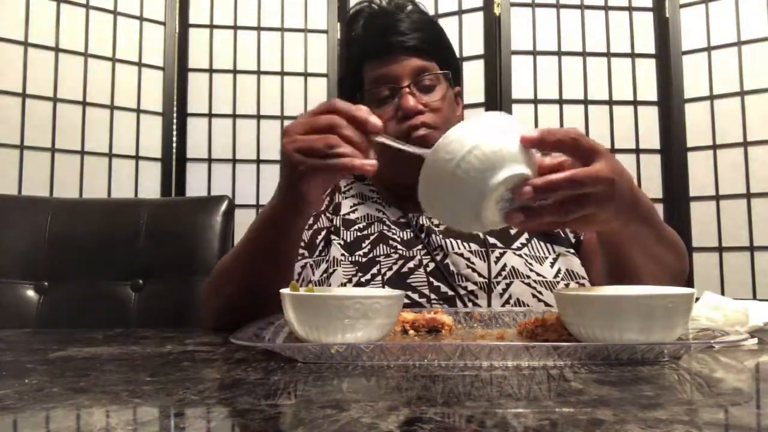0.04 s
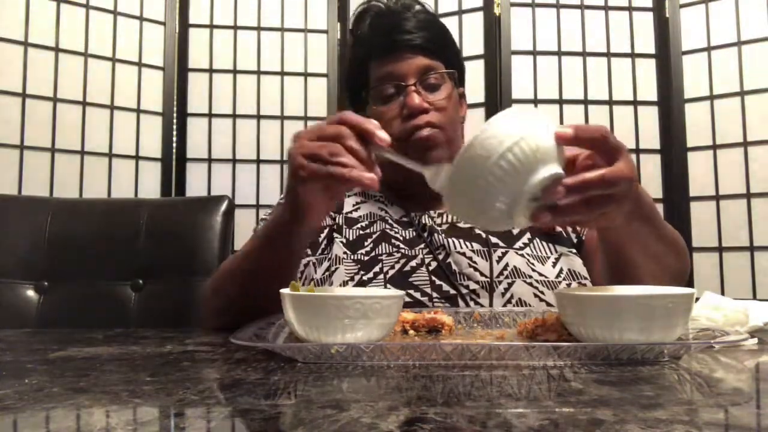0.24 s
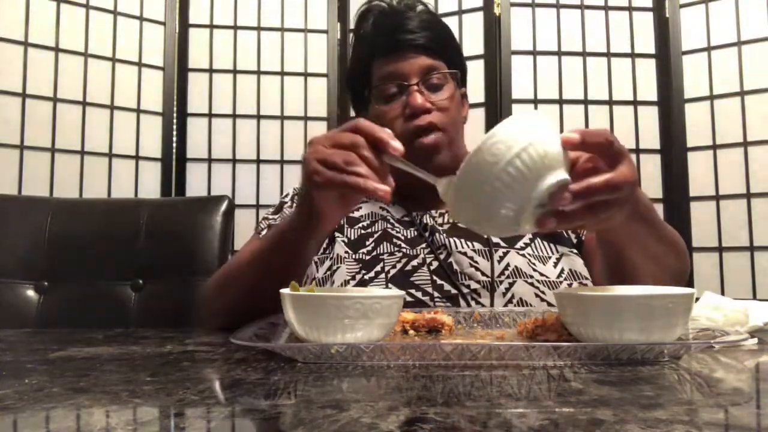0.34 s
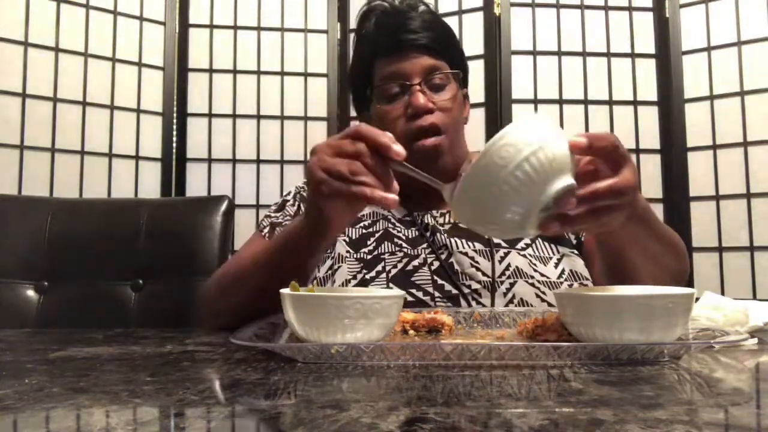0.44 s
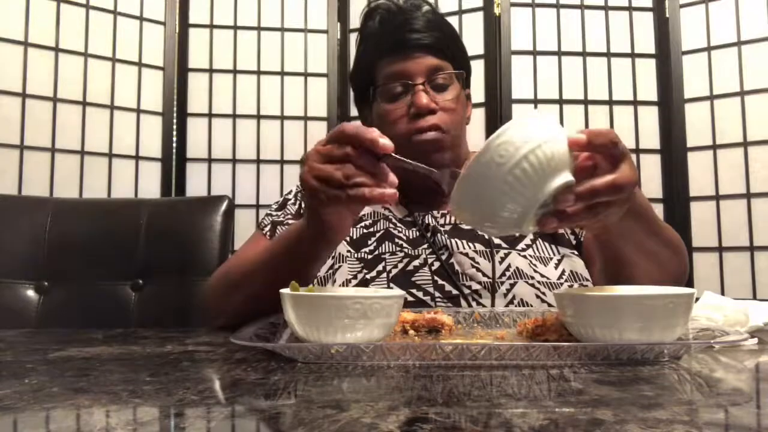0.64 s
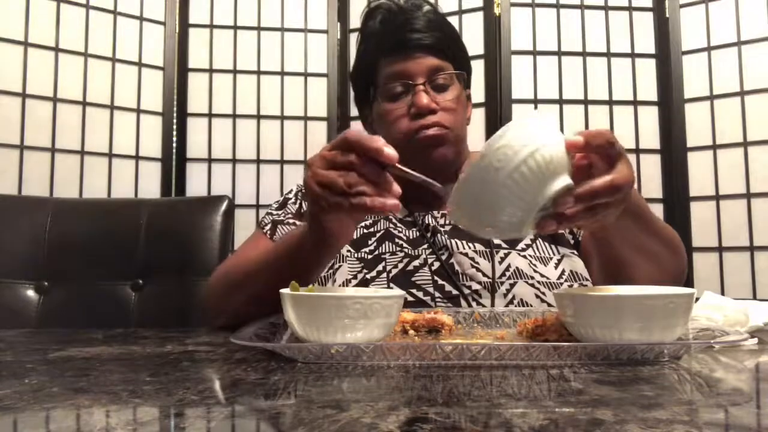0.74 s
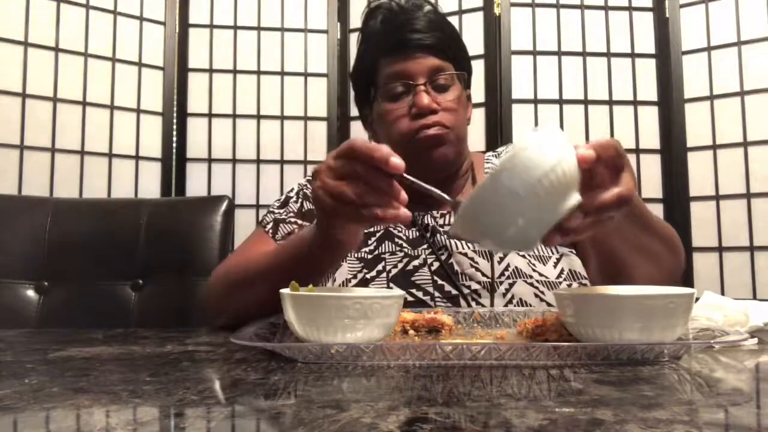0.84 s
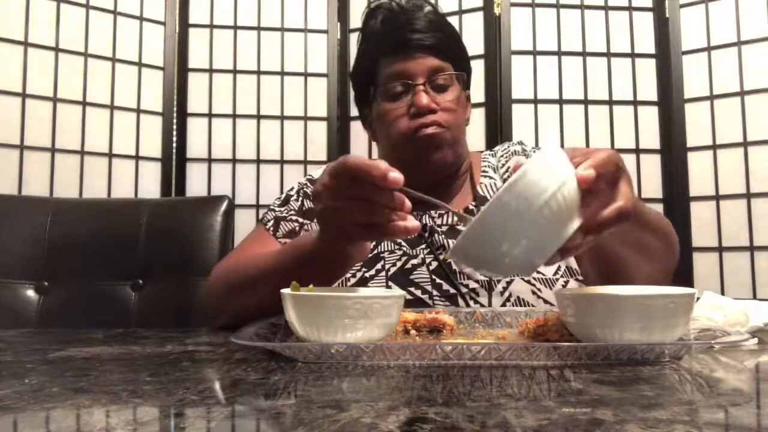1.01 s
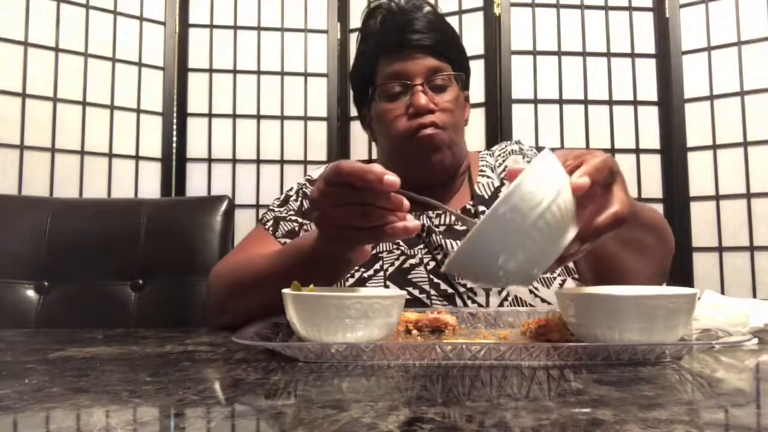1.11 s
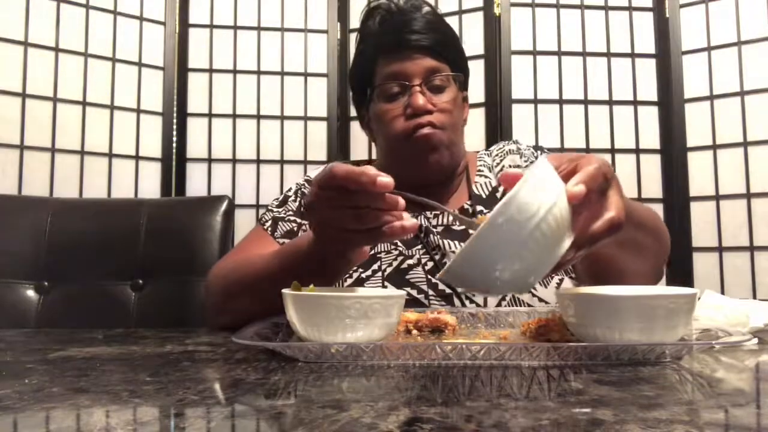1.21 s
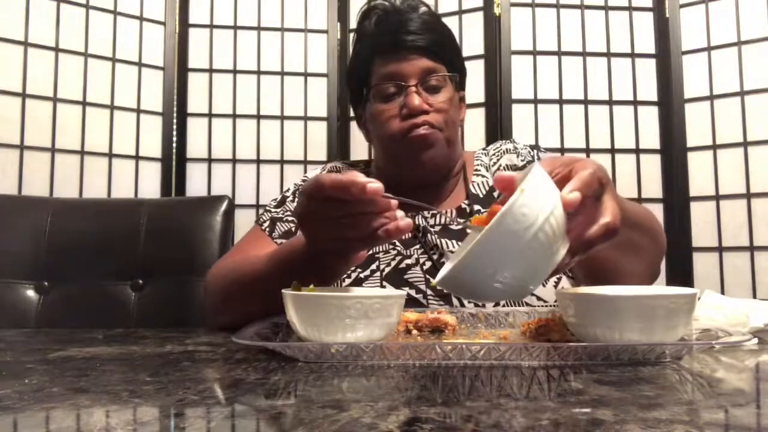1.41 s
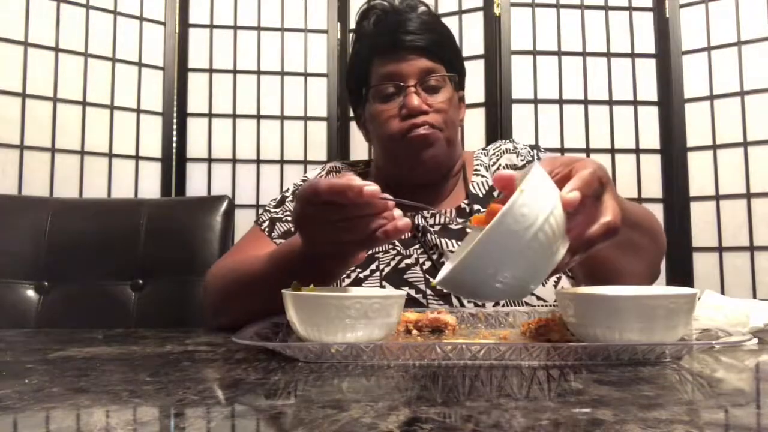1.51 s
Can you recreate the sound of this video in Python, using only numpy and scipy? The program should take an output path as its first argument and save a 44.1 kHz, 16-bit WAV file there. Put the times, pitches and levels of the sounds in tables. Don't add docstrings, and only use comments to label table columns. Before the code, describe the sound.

A fork scoops soft food from a hand-held ceramic bowl. Faint sliding starts it; at 0.22 s a hard, bright double clink rings briefly, damped by the hand. Ticks and a soft pop cluster at 0.44 s, a dull rub at 0.56 s, lighter clinks at 0.61, 0.78 and 0.95 s, then faint scraping and tiny taps until about 1.35 s. Small room, short echo, low hum, phone a metre away.

```python
import sys
import numpy as np
from scipy import signal
from scipy.fft import rfft, irfft
from scipy.io import wavfile

SR = 44100
rng = np.random.default_rng(int(sys.argv[2]) if len(sys.argv) > 2 else 0)


def nominal_scale(level):
    x = np.asarray(level, float) / 20
    return 10 ** x


def dump(signal):
    limited = np.clip(np.atleast_2d(signal).T, -1, 1)
    pcm = np.round(limited * 32767).astype(np.int16)
    wavfile.write(sys.argv[1], SR, pcm)


N = 68355
ONSET_S = 0.00051


def level(x, db):
    return x * nominal_scale(db) / np.sqrt(np.mean(x ** 2))


def band(x, hz, width_hz):
    return signal.lfilter(*signal.iirpeak(min(hz, .45 * SR), hz / width_hz, fs=SR), x)


def steep_band(x, hz, width_hz):
    return band(band(x, hz, width_hz), hz, width_hz)


def add(out, start_s, x):
    i = int(start_s * SR)
    out[i:i + len(x)] += x[:N - i]


def fade(t60_s, size=8000):
    t = np.arange(size) / SR
    return t, np.exp(-np.log(1000) * t / np.reshape(t60_s, (-1, 1)))


def onset(t, rise_s=ONSET_S):
    return np.minimum(t / rise_s, 1)


BOWL_HZ = (1560, 1690, 2520, 3010, 3765, 3830, 4240, 5314, 6500, 6670, 6800, 7550, 10090, 14200)
BOWL_DB = (-10.5, -0.5, -4.5, -6.5, -7, 0, -5.5, -6, -4.5, -2.5, -2, -11.5, -3, -5)
BOWL_T60_S = (.035, .025, .025, .02, .09, .06, .03, .03, .045, .05, .08, .025, .045, .05)
FORK_HZ = (8750, 10450, 11420, 12600, 13540, 14790, 15240, 15560)
FORK_DB = (-8.5, -7, -9, -9.5, -1, -6.5, -8.5, -13)
FORK_T60_S = (.025, .025, .035, .015, .02, .045, .025, .025)
STRIKE_HZ = (1700, 3800, 6700, 12000)
CRACK_DB = (-9, 0, 1, 1)
# t/s, level/dB in each of the four strike bands
CLINKS = [(.2160, -18, -21, -19, -18), (.2187, -30, -25, -20.5, -21), (0.3139, -46, -49, -35, -64),
          (0.3379, -50, -44, -35, -45), (0.6119, -26.5, -30.5, -36.5, -41.5),
          (.7820, -31.5, -55, -36.5, -68), (.2222, -40, -30, -26, -30), (0.9529, -30, -32, -33, -46),
          (1.2330, -42.5, -51, -61, -69), (1.285, -50, -48, -48, -42), (1.328, -63, -45, -53, -50)]
CRACK_T60_S, PLACE_SD_DB, DETUNE_SD = 0.047, 1.25, 0.0015
HARD_DB, RING_GROWTH, FORK_GROWTH = -17, 0.54, 0.94


def clinks():
    out = np.zeros(N)
    hz = np.array(BOWL_HZ + FORK_HZ)
    mode_db = np.array(BOWL_DB + FORK_DB)
    t60_s = np.array(BOWL_T60_S + FORK_T60_S)
    fork = slice(len(BOWL_HZ), None)
    for start_s, *strike_db in CLINKS:
        place, sign, detune = rng.standard_normal((3, len(hz)))
        hardness_db = max(strike_db) - HARD_DB
        soft_db = FORK_GROWTH * min(hardness_db, 0)
        force_db = np.interp(np.log(hz), np.log(STRIKE_HZ), strike_db)
        gain = nominal_scale(mode_db + force_db + PLACE_SD_DB * place)
        gain[fork] *= nominal_scale(soft_db) * np.sign(sign[fork])
        t, decay = fade(t60_s * nominal_scale(RING_GROWTH * hardness_db))
        struck_hz = hz * (1 + DETUNE_SD * detune)
        modes = decay * np.sin(2 * np.pi * struck_hz[:, None] * t)
        add(out, start_s, gain @ modes * onset(t))

        burst = rng.standard_normal(2000) * fade(CRACK_T60_S, size=2000)[1][0]
        for f, force, crack in zip(STRIKE_HZ, strike_db, CRACK_DB):
            noise = band(band(burst, f, 0.72 * f), f, f)
            add(out, start_s, nominal_scale(force + crack + soft_db / 2) * noise)
    return out


# t/s, level/dB, f/Hz, t60/s
RINGS = [(.2163, -16.5, 3802, .07), (0.2185, -40, 3772, 0.37), (.2167, -50, 14210, 0.18),
         (.2190, -15, 6500, 0.056), (0.4408, -50, 2500, .3), (.5850, -58, 3360, .15),
         (0.6125, -31, 6680, 0.03), (0.6124, -32, 1660, .02), (.6126, -52.5, 8730, 0.046),
         (.7824, -46, 3758, 0.15), (.7825, -53.5, 1561, 0.16), (0.782, -49, 6826, 0.088),
         (0.784, -51, 2950, 0.072), (0.953, -33, 7700, 0.0074), (0.9531, -30, 4010, 0.026),
         (0.9534, -45, 1750, 0.02), (.9530, -41, 10260, 0.025), (.9531, -34.5, 2350, 0.025),
         (0.9527, -41, 6794, 0.3), (.9530, -42, 6960, .2), (0.954, -53.5, 4220, 0.19),
         (1.1450, -61, 7270, 0.19), (.8530, -53, 1561, .09), (1.2850, -46, 1292, .08),
         (1.2850, -50, 3700, .07), (1.2850, -54, 5502, .08), (1.2850, -52, 6848, .08),
         (1.2860, -50, 6600, .05), (.2650, -38, 3810, .2), (.2480, -38, 6700, .12)]
FLUTTER_HZ, FLUTTER_DB = 79, 5


def rings():
    out = np.zeros(N)
    lowpass = signal.butter(2, FLUTTER_HZ, fs=SR)
    for start_s, db, hz, t60_s in RINGS:
        t, decay = fade(t60_s, size=16000)
        flutter = level(signal.lfilter(*lowpass, rng.standard_normal(len(t))), 0)
        tone = decay[0] * np.sin(2 * np.pi * hz * t) * onset(t)
        add(out, start_s, nominal_scale(db + FLUTTER_DB * flutter) * tone)
    return out


# t/s, level/dB, f/Hz, t60/s
DRY_RINGS = [(.6122, -22, 6690, .035), (.9527, -28, 6850, .014), (.9527, -42, 14200, .03),
             (.9527, -36, 5300, .012), (.7822, -36, 15100, .015), (1.2848, -44, 3600, .02),
             (.2163, -26, 2250, .02), (.2320, -36, 14200, .1), (.2180, -34, 10090, .15),
             (.4410, -38, 1600, .04), (1.0380, -52, 2400, .03)]


def dry_rings():
    out = np.zeros(N)
    for start_s, db, hz, t60_s in DRY_RINGS:
        t, decay = fade(t60_s)
        add(out, start_s, nominal_scale(db) * decay[0] * np.sin(2 * np.pi * hz * t) * onset(t))
    return out


# t/s, level/dB, f/Hz, t60/s
TICKS = [(.0160, -40, 894, 0.023), (0.3382, -44, 15000, .006), (.3880, -56, 14100, 0.0053),
         (.4350, -35, 8530, 0.0089), (0.435, -30, 15500, 0.0065), (0.4356, -38, 2960, 0.011),
         (0.439, -34, 2600, 0.023), (.4400, -25, 3410, 0.0095), (0.4414, -38, 12900, .01),
         (0.4385, -33.5, 7580, 0.012), (0.4422, -30, 1710, 0.017), (.4420, -28.5, 520, 0.013),
         (.4490, -37, 9800, 0.0063), (.4645, -38, 12200, 0.011), (.4648, -42, 15200, 0.0066),
         (.5560, -39, 790, .022), (.5850, -61, 8400, 0.027), (.6710, -51, 14400, 0.0087),
         (.6860, -58, 13100, .008), (.7820, -34, 15500, .012), (.7822, -26.5, 8530, 0.01),
         (.7835, -40, 8340, 0.019), (1.0640, -41.5, 820, 0.021), (1.2852, -52, 2250, 0.035),
         (.5550, -52, 5100, .012), (.9530, -33, 6900, .012), (1.2330, -55, 2450, .025),
         (.2240, -33, 14800, .02), (1.466, -56, 3100, 0.037)]
TICK_RISE_S, TICK_NOISE = 0.00043, 0.61


def ticks():
    out = np.zeros(N)
    for start_s, db, hz, t60_s in TICKS:
        t, decay = fade(t60_s, size=2000)
        noise = level(steep_band(rng.standard_normal(len(t)), hz, hz / 3), 0)
        knock = np.sin(2 * np.pi * hz * t) + TICK_NOISE * noise
        add(out, start_s, nominal_scale(db) * decay[0] * onset(t, TICK_RISE_S) * knock)
    return out


def grit(per_s, spread_db):
    hit, sign, size = rng.random((3, N))
    size_db = -spread_db * np.log(1 - size)
    return level((hit < per_s / SR) * np.sign(sign - .5) * nominal_scale(size_db), 0)


def gate(start_s, length_s, edge_s=0.016):
    t = np.arange(N) / SR - start_s
    return np.clip(np.minimum(t * 4, length_s + edge_s - t) / edge_s, 0, 1)


# t/s, length/s, level/dB, f/Hz, width/Hz
RUBS = [(0.014, 0.061, -57.5, 680, 900), (.217, 0.016, -32.5, 4700, 4000), (.218, .03, -43, 12500, 6000),
        (0.434, .005, -44.5, 12000, 8000), (0.439, 0.0027, -37.5, 805, 910), (.498, .03, -66, 2550, 200),
        (.556, .12, -52.5, 695, 200), (.557, 0.096, -56, 906, 231.5), (0.655, 0.01, -66, 7600, 800),
        (.783, .015, -55, 14100, 2500), (1.32, 0.025, -60, 3650, 250), (1.255, 0.012, -64, 6850, 200),
        (0.996, 0.094, -53.5, 247, 120), (1.016, 0.18, -66, 2940, 3000), (1.224, 0.1, -57, 1300, 90),
        (1.231, 0.11, -66, 4250, 300)]
RUB_PER_S, RUB_SPREAD_DB = 3700, 1.9


def rubs():
    out = np.zeros(N)
    for start_s, length_s, db, hz, width_hz in RUBS:
        rub = steep_band(grit(RUB_PER_S, RUB_SPREAD_DB), hz, width_hz)
        out += gate(start_s, length_s) * level(rub, db)
    return out


# t/s, length/s, level/dB
DRAGS = [
    (0.242, 0.12, -55),
    (.96, 0.32, -67.5),
    (1.226, 0.121, -65.5),
    (1.28, 0.0053, -52),
]
DRAG_PER_S, DRAG_SPREAD_DB, DRAG_TILT_DB_PER_OCT = 990, 2.94, -1.5


def drags():
    slips = grit(DRAG_PER_S, DRAG_SPREAD_DB)
    ring = np.zeros(N)
    for hz, db, t60_s in zip(BOWL_HZ, BOWL_DB, BOWL_T60_S):
        tilt_db = DRAG_TILT_DB_PER_OCT * np.log2(hz / 4000)
        ring += level(band(slips, hz, 6 / t60_s), db + tilt_db)
    pressure = sum(nominal_scale(db) * gate(start_s, length_s) for start_s, length_s, db in DRAGS)
    return level(ring, 0) * pressure


# t/s, level/dB, f/Hz, width/Hz, t60/s
WASHES = [(.2170, -47, 5000, 5000, .12), (.4440, -46, 3700, 1400, .25), (.4420, -54, 1400, 900, .1),
          (.6125, -42, 2700, 1200, .1), (.7850, -56, 8800, 1500, .2), (.7850, -58, 14600, 2000, .15),
          (.9535, -47, 3900, 900, .25), (.9535, -46, 2600, 1200, .15), (.9535, -48, 5700, 1200, .2),
          (.2165, -36, 720, 250, .03), (.2165, -38, 980, 200, .03), (.6122, -34, 6700, 300, .12),
          (.9528, -36, 6200, 1800, .012), (.9530, -57, 14100, 500, .2), (.7822, -38, 15200, 1200, .02),
          (.6125, -50, 14100, 500, .05), (.9535, -45, 6950, 400, .3)]


def washes():
    out = np.zeros(N)
    for start_s, db, hz, width_hz, t60_s in WASHES:
        t, decay = fade(t60_s)
        noise = level(steep_band(rng.standard_normal(len(t)), hz, width_hz), db)
        add(out, start_s, decay[0] * onset(t) * noise)
    return out


# f/Hz, t60/s
ROOM_T60 = [(500, 0.36), (2000, 0.33), (5000, 0.35), (7000, .3), (10000, 0.17), (15000, 0.34)]
ROOM_DB, ROOM_GAP_S = -12.5, 0.0026


def room(x):
    hz, t60_s = np.array(ROOM_T60).T
    bands_hz = 300 * 2 ** np.arange(0, 5.8, .5)
    t, decays = fade(np.interp(np.log(bands_hz), np.log(hz), t60_s), size=22050)
    echo = np.zeros(len(t))
    for f, decay in zip(bands_hz, decays):
        echo += decay * band(rng.standard_normal(len(t)), f, f / 3)
    echo *= t > ROOM_GAP_S
    echo *= nominal_scale(ROOM_DB) / np.sqrt(np.sum(echo ** 2))
    return signal.fftconvolve(x, echo)[:N]


# f/Hz, level/dB per Hz
HUSH = [(41, -57), (70, -13), (194, -7), (232, -1.5), (334, -10.5), (429, -7.5), (1160, -23), (7270, -41),
        (15700, -59)]
# f/Hz, width/Hz, level/dB
DRONES = [(169.3, 11, -54), (220, 5.9, -53.5), (243.3, 18, -56.5), (339.4, 17, -60.5), (385.5, 17, -63),
          (6900, 300, -76.5), (13800, 4000, -80.5)]
HUSH_DB, HUM_HZ, HUM_DB = -50, 54.3, -64.5


def hush():
    f = np.arange(1, N // 2 + 2) * SR / N
    hz, db = np.array(HUSH).T
    shape = nominal_scale(np.interp(np.log(f), np.log(hz), db, left=-60))
    air = level(irfft(rfft(rng.standard_normal(N)) * shape, N), HUSH_DB)
    drone = sum(level(band(rng.standard_normal(N), f0, width), d) for f0, width, d in DRONES)
    hum = nominal_scale(HUM_DB) * np.sqrt(2) * np.sin(2 * np.pi * HUM_HZ * np.arange(N) / SR)
    return air + drone + hum


def scene():
    near = clinks() + rings() + ticks() + rubs() + drags()
    return (near + room(near) + dry_rings() + washes() + hush())[None]


def top_cut(x):
    return signal.sosfilt(signal.butter(12, 17000, fs=SR, output="sos"), x)


def record(dry):
    lowpass = signal.cheby1(8, 1, 15850, fs=SR, output="sos")
    mix = signal.sosfilt(lowpass, dry)
    return top_cut(mix)


dry = scene()
out = record(dry)
dump(out)
```